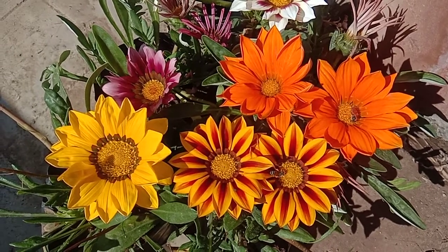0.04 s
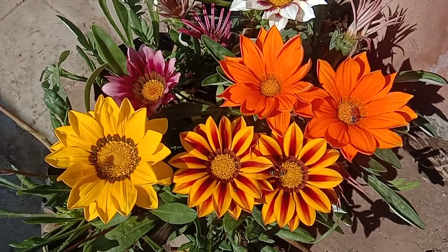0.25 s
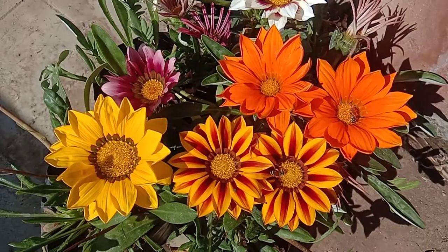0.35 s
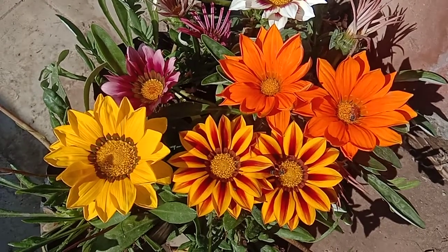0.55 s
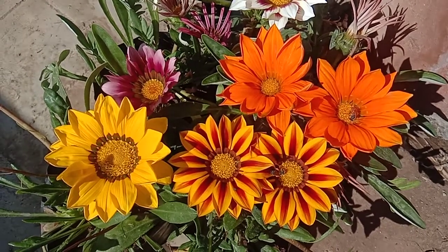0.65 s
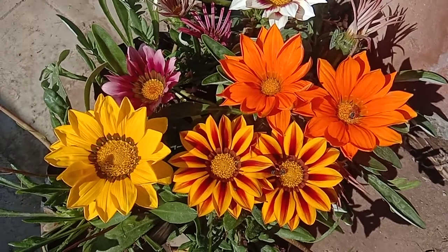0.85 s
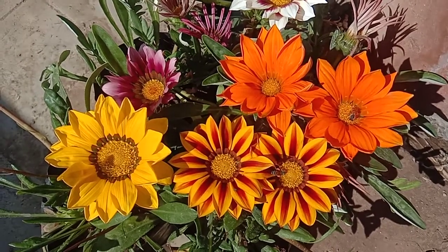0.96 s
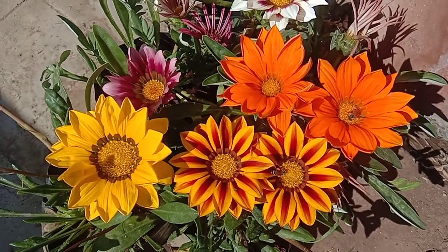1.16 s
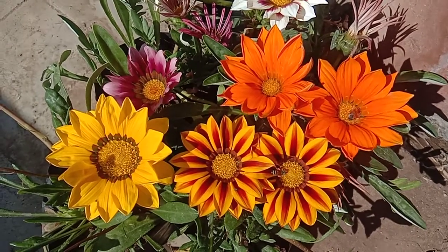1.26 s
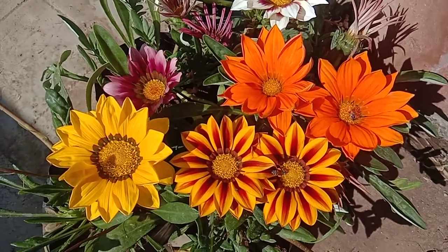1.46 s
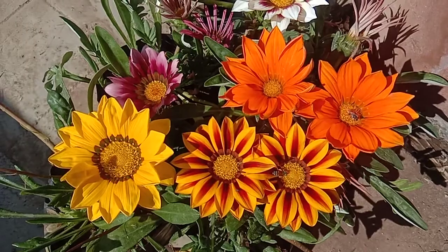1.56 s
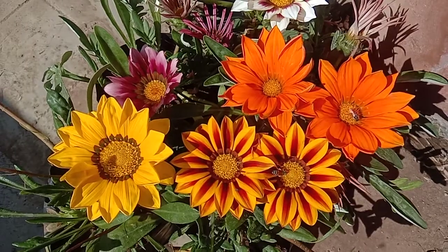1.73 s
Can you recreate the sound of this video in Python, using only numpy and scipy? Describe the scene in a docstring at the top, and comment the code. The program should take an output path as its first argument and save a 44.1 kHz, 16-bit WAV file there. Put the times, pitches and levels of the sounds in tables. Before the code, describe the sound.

Wind rumbles on a microphone over a flower bed, swelling in short gusts with a few low thumps before easing. Faint traffic and a soft hiss lie far behind.

```python
"""A light breeze blows across a microphone standing over a flower bed.
Its turbulence rumbles unevenly at the port and swells in short gusts; single eddies hit as thumps.
Far behind lie a wash of traffic with a soft hiss on top, a thin wavering ring
and a few faint hums and peeps."""
import sys
import numpy as np
from scipy import signal
from scipy.io import wavfile
from scipy.ndimage import map_coordinates

SR = 44100
rng = np.random.default_rng(int(sys.argv[2]) if len(sys.argv) > 2 else 0)


def generate_wav(sig):
    """Save sig (samples, or channels by samples) to the path in sys.argv[1] as 16-bit PCM at SR."""
    pcm = np.round(np.clip(np.atleast_2d(sig).T, -1, 1) * 32767).astype(np.int16)
    wavfile.write(sys.argv[1], SR, pcm)


N = 79380
TIME = np.arange(N) / SR


def from_db(db):
    """Decibels to gain."""
    return 10 ** (np.asarray(db) / 20)


def unit_rms(x):
    """Scale to an rms of 1."""
    return x / np.sqrt(np.mean(x ** 2) + 1e-20)


def in_time(rows):
    """A curve of (time, value) rows at every sample."""
    return np.interp(TIME, *np.transpose(rows))


def gain_at(spectrum, hz):
    """The gain of a spectrum of (Hz, dB) rows at one frequency."""
    freqs, db = np.transpose(spectrum)
    return from_db(np.interp(np.log(hz), np.log(freqs), db))


def swell(peak_s, half_s):
    """A bell-shaped rise and fall of height 1."""
    return np.exp(-.5 * ((TIME - peak_s) / half_s) ** 2)


def drift(per_s):
    """A random wander of rms 1 that takes per_s new values a second."""
    knots = rng.standard_normal(400)
    return unit_rms(np.interp(TIME * per_s, np.arange(len(knots)), knots))


def noise_bands(low_hz, high_hz, count):
    """Neighbouring bands of steady noise, each as (centre Hz, samples)."""
    edges = np.geomspace(low_hz, high_hz, count + 1)
    bands = []
    for low, high in zip(edges, edges[1:]):
        band_pass = signal.butter(2, [low, high], "band", fs=SR, output="sos")
        noise = signal.sosfilt(band_pass, rng.standard_normal(N + SR))[SR:]
        bands.append((np.sqrt(low * high), noise))
    return bands


# The breeze as it reaches the microphone: (time [s], level [dB])
BREEZE_LEVEL = [(0, -37), (.035, -53), (.13, -51), (.2, -45), (.29, -44.5), (.35, -40.5), (.39, -49.5),
                (.47, -43.5), (.56, -39), (.65, -36), (.71, -44), (.76, -44), (.865, -41), (.9, -64),
                (.99, -39), (1.1, -43.5), (1.2, -42), (1.31, -32.5), (1.42, -49), (1.5, -55), (1.58, -50),
                (1.66, -56), (1.8, -59.5)]
# Gusts at the microphone: (peak time [s], level [dB], half length [s], eddy rate [Hz])
GUSTS = [(.066, -36.5, 0.0066, 99), (0.171, -36, 0.0086, 116), (0.234, -25.5, .01, 97.95),
         (0.419, -29.5, 0.01, 121.8), (0.442, -31, 0.011, 84.6), (0.529, -27, 0.0068, 118.1),
         (0.547, -26, 0.0044, 123.1), (0.595, -29, 0.0066, 115.4), (0.646, -34.5, 0.0048, 181.5),
         (0.663, -29.5, 0.009, 97.3), (0.749, -36, 0.02, 72.8), (0.791, -36, 0.0068, 94.7),
         (0.821, -41, 0.0067, 90), (0.994, -30, 0.013, 109.5), (1.041, -28, 0.014, 94.6),
         (1.073, -35.5, 0.0077, 115.7), (1.115, -27.5, 0.0051, 105.1), (1.144, -30, 0.0087, 85.5),
         (1.257, -29, 0.00964, 122.4), (1.293, -27, 0.0067, 115.5), (1.458, -40, 0.011, 70.2),
         (1.529, -39, .011, 90.2), (1.723, -42.5, 0.014, 100.6)]
# Rumble at the port for an eddy rate of RUMBLE_HZ: (frequency [Hz], relative density [dB])
RUMBLE_SPECTRUM = [(22, -31), (42, -24), (62, -5), (90, 5), (125, -5), (180, -16), (260, -29.5), (400, -46),
                   (600, -62.5)]
RUMBLE_HZ, BREEZE_EDDY_HZ = 90, 84.1


def wind(steady_s=0.017, port_band_hz=(50, 296)):
    """Turbulence right at the port: each gust raises the level and sweeps eddies past at its own rate."""
    flows = [(from_db(in_time(BREEZE_LEVEL)), BREEZE_EDDY_HZ)]
    flows += [(from_db(db) * swell(peak_s, half_s), hz) for peak_s, db, half_s, hz in GUSTS]
    energy = sum(level ** 2 for level, hz in flows)
    speed = sum(level ** 2 * hz for level, hz in flows) / energy / RUMBLE_HZ
    rumble = sum(noise * gain_at(RUMBLE_SPECTRUM, hz) for hz, noise in noise_bands(20, 600, count=12))
    # Even out the noise, so that breeze and gusts set the swells.
    window = signal.windows.hann(2 * int(steady_s * SR) + 1)
    weight = signal.fftconvolve(np.ones(N), window, "same")
    power = signal.fftconvolve(rumble ** 2, window, "same") / weight
    even = rumble / np.sqrt(np.abs(power) + 1e-20)
    # A faster flow runs through the rumble sooner and lifts its pitch.
    swept = map_coordinates(even, [np.cumsum(speed)], order=1, mode="mirror")
    port = signal.butter(3, port_band_hz, "band", fs=SR, output="sos")
    return signal.sosfilt(port, np.sqrt(energy) * swept)


# Far traffic and air, heard from the flower bed: (frequency [Hz], relative density [dB])
TRAFFIC_SPECTRUM = [(30, 0), (100, 0), (200, -3), (330, -10.5), (480, -12), (640, -14.5), (860, -18.5),
                    (1100, -19), (1500, -21), (1850, -20.5), (2400, -27), (3000, -30.5), (4000, -33.5),
                    (5500, -37.5), (7000, -41.5), (8200, -45.5), (13800, -45), (15200, -39.5)]
# That wash at the microphone: (time [s], level [dB])
TRAFFIC_LEVEL = [(0, -55.5), (.35, -56), (.55, -57.5), (.77, -56), (1.1, -56.5), (1.45, -56), (1.8, -59)]


def traffic(flutter_db=2.5):
    """A distant wash whose narrow middle bands flutter; above them it thins out into smooth hiss."""
    smooth = noise_bands(30, 400, count=7) + noise_bands(6500, 17000, count=7)
    wash = sum(noise * gain_at(TRAFFIC_SPECTRUM, hz) for hz, noise in smooth)
    for hz, noise in noise_bands(400, 6500, count=48):
        flutter = unit_rms(from_db(flutter_db * drift(per_s=14)))
        wash += noise * gain_at(TRAFFIC_SPECTRUM, hz) * flutter
    return from_db(in_time(TRAFFIC_LEVEL)) * unit_rms(wash)


# A thin ring in the background, as it reaches the microphone: (time [s], level [dB])
RING_LEVEL = [(0, -65), (.18, -67.5), (.26, -74.5), (.42, -69.5), (.55, -73), (.65, -64.5), (.88, -70.5),
              (.97, -62.5), (1.08, -67.5), (1.2, -68), (1.3, -68.5), (1.4, -66.5), (1.5, -76), (1.62, -70),
              (1.72, -72), (1.8, -72.5)]
# The centre of that ring: (time [s], pitch [Hz])
RING_PITCH = [(0, 1275), (.2, 1278), (.4, 1304), (.55, 1275), (.66, 1313), (.76, 1245), (.95, 1270),
              (1.1, 1280), (1.8, 1284)]


def ring(width_hz=75, waver_db=2):
    """A narrow band of noise, well behind the wind, that wanders in pitch and wavers in level."""
    narrow = signal.butter(2, width_hz / 2, fs=SR, output="sos")
    in_phase, quadrature = signal.sosfilt(narrow, rng.standard_normal((2, N + SR)))[:, SR:]
    phase = 2 * np.pi * np.cumsum(in_time(RING_PITCH)) / SR
    band = in_phase * np.cos(phase) + quadrature * np.sin(phase)
    waver = from_db(waver_db * drift(per_s=36))
    return from_db(in_time(RING_LEVEL)) * unit_rms(waver * band)


# Faint tones far from the microphone: (peak time [s], pitch [Hz], level [dB], half length [s])
HUMS_AND_PEEPS = [(.115, 332, -55, 0.012), (.316, 3346, -75, 0.0053), (.7, 3282, -73, .005),
                  (1.06, 5700, -78, .012), (1.11, 3260, -73.5, 0.01), (1.17, 3324, -76, 0.0094),
                  (1.21, 3337, -76.5, 0.015), (1.33, 3320, -76.5, 0.018), (1.605, 3400, -77.5, 0.018),
                  (1.617, 1275, -55.5, 0.0067), (1.751, 411, -51.5, 0.0095), (1.793, 385, -50, 0.014)]


def hums_and_peeps(jitter_rad=0.75):
    """Brief low hums and high peeps, blurred by distance: their phase jitters."""
    tones = np.zeros(N)
    for peak_s, hz, db, half_s in HUMS_AND_PEEPS:
        phase = 2 * np.pi * hz * TIME + jitter_rad * drift(per_s=180)
        tones += from_db(db) * swell(peak_s, half_s) * np.sin(phase)
    return tones


# Single eddies that hit the microphone's port: (time [s], peak level [dB], width [s])
EDDY_HITS = [(0.176, -28, 0.0023), (.41, -22, 0.0017), (0.485, -26.5, 0.0018), (.514, -20.5, 0.00095),
             (.523, -23.5, 0.0023), (0.5368, -10, 0.00084), (.546, -19.5, 0.00063), (0.569, -21.5, 0.0015),
             (0.599, -22, 0.0021), (0.627, -21, 0.0013), (1.061, -21, 0.0015), (1.132, -21, 0.0019),
             (1.141, -17, 0.00082), (1.2818, -9, .00098), (1.369, -34, 0.0014)]


def eddies(bass_cuts_hz=(109.4, 70)):
    """Each eddy is one smooth pressure pulse; the microphone's bass cut makes it swing back."""
    bass_cut = np.vstack([signal.butter(2, hz, "high", fs=SR, output="sos") for hz in bass_cuts_hz])
    thumps = np.zeros(N)
    for hit_s, db, width_s in EDDY_HITS:
        pulse = 1 / np.cosh(np.minimum(np.abs(TIME - hit_s) / width_s, 20))
        thump = signal.sosfilt(bass_cut, pulse)
        thumps += from_db(db) * thump / np.abs(thump).max()
    return thumps


def scene():
    """One microphone over the flower bed: wind right on it, everything else far behind."""
    return (wind() + traffic() + ring() + hums_and_peeps() + eddies())[None]


def record(dry, cutoff_hz=15600):
    """The microphone's signal, with the highest treble cut steeply."""
    treble_cut = signal.ellip(10, .1, 80, cutoff_hz, fs=SR, output="sos")
    return signal.sosfilt(treble_cut, dry)


dry = scene()
out = record(dry)
generate_wav(out)
```